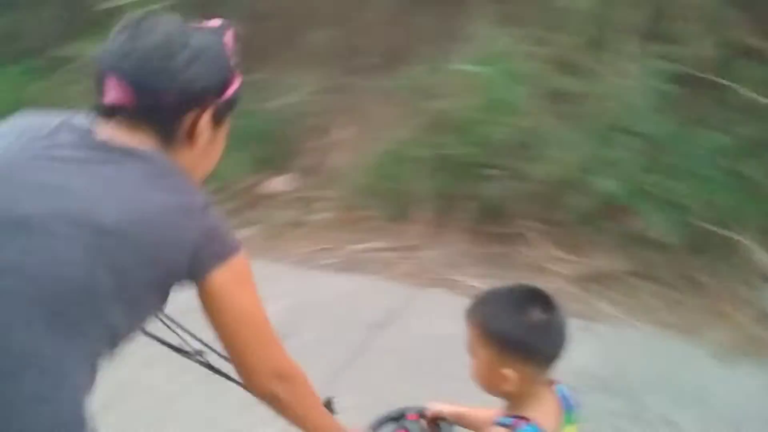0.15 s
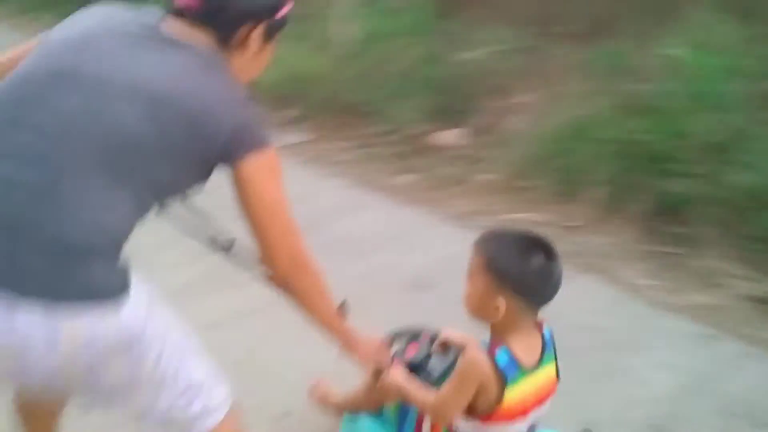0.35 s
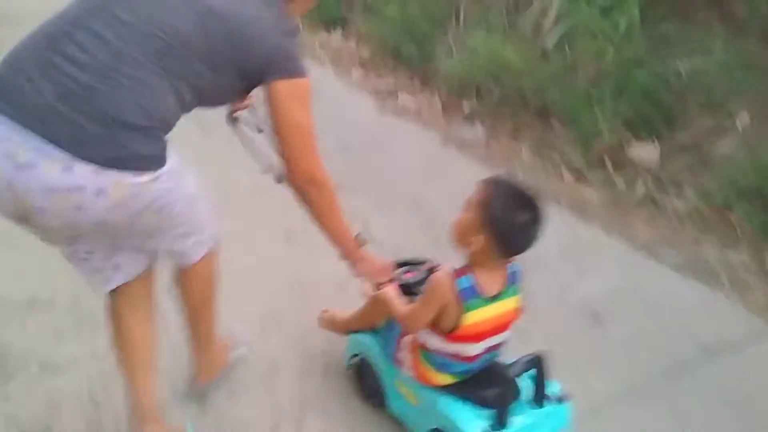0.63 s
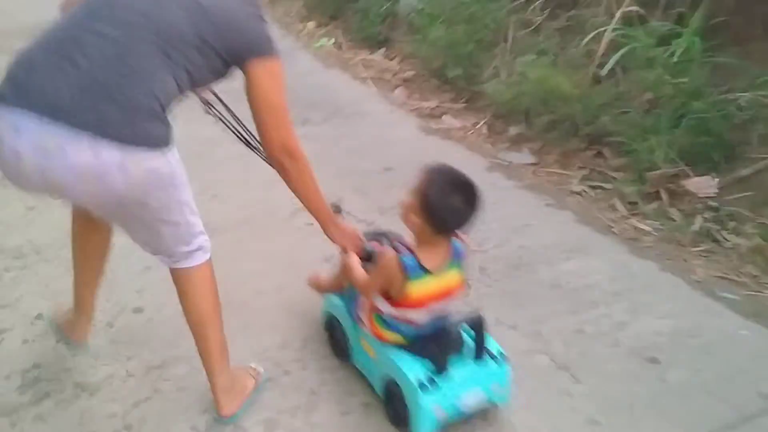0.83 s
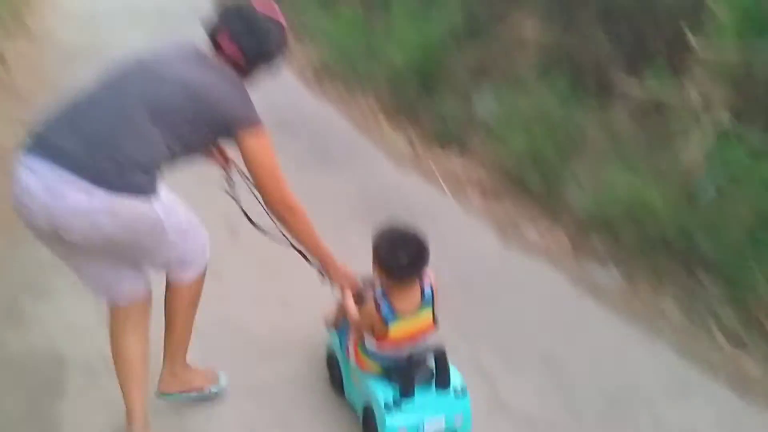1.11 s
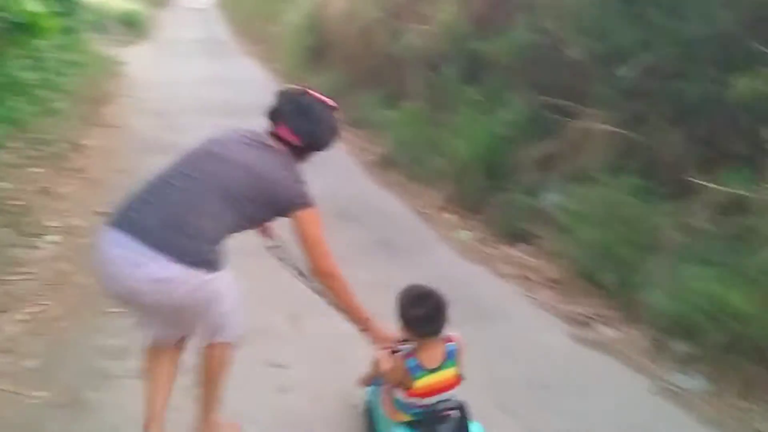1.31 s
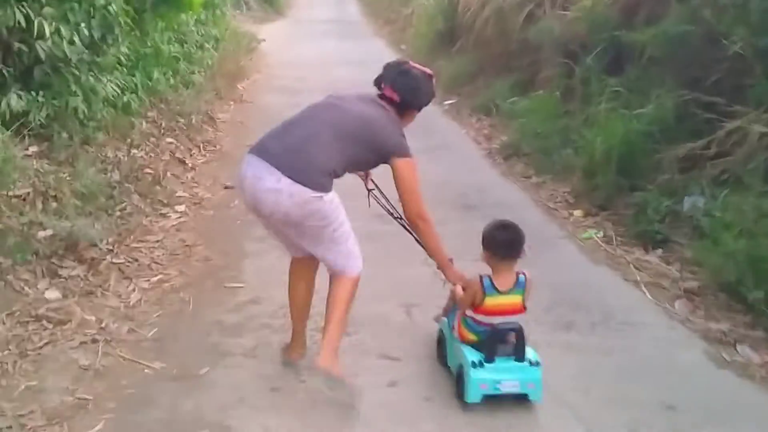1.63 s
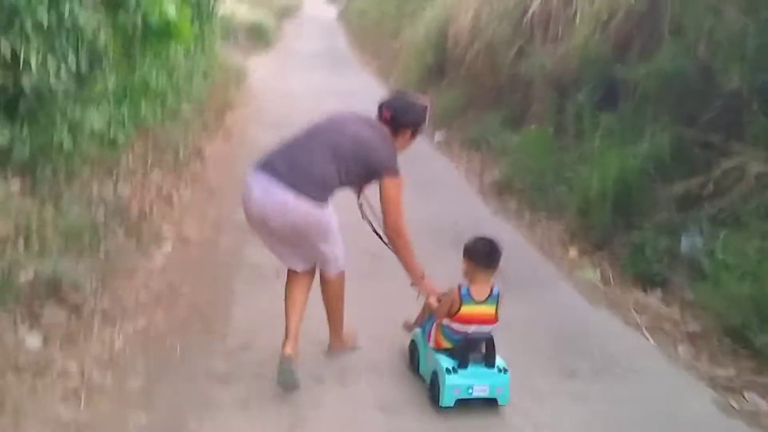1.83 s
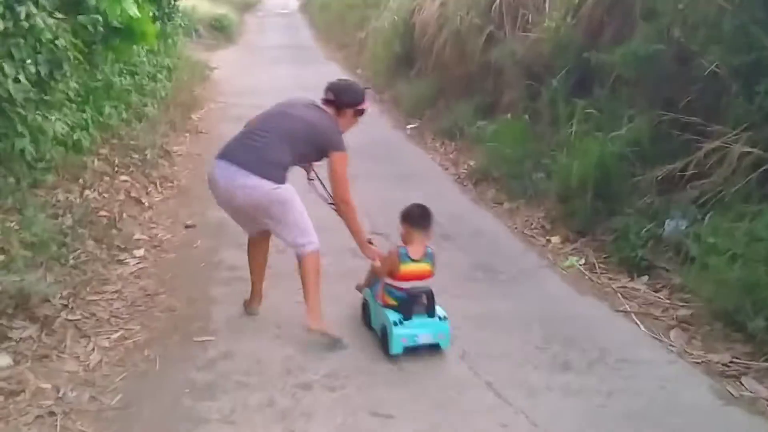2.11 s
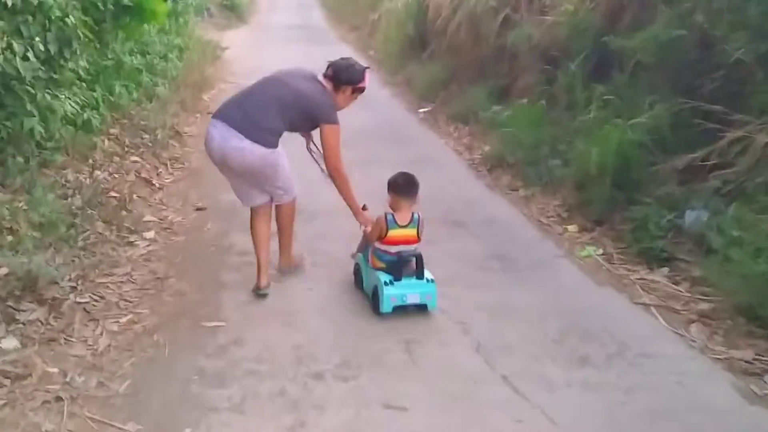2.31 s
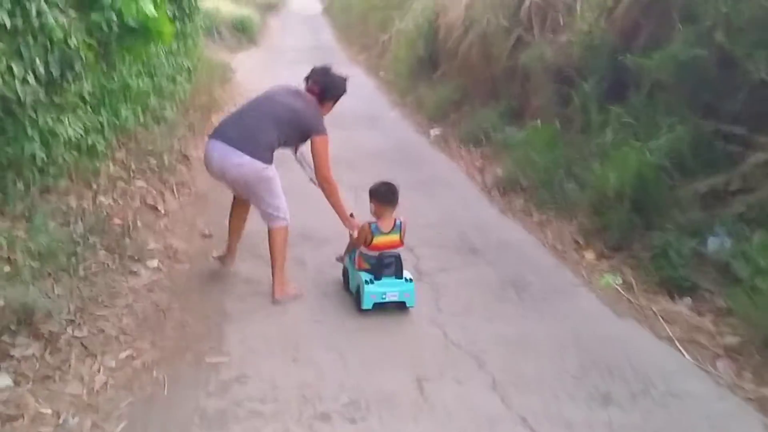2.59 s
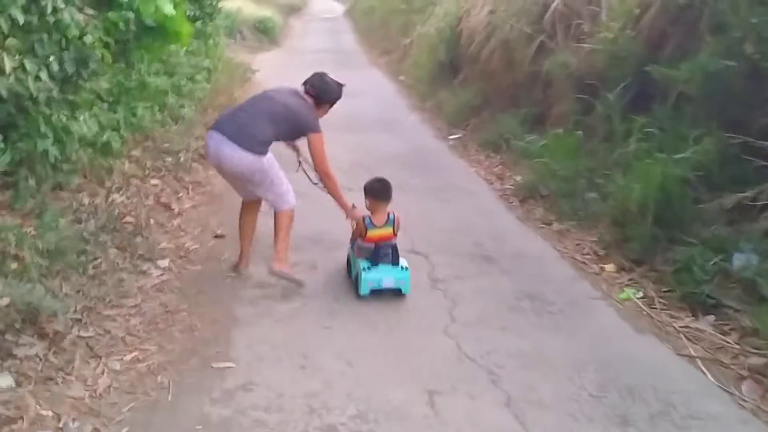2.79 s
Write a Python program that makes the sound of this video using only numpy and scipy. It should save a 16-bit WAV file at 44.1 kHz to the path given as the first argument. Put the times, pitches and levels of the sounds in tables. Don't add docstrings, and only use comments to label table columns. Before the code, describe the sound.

Hard plastic wheels of a hollow ride-on toy car rumble and rattle away over rough concrete

```python
import sys
import numpy as np
from scipy import signal
from scipy.io import wavfile
from scipy.ndimage import uniform_filter1d

SR = 44100
rng = np.random.default_rng(int(sys.argv[2]) if len(sys.argv) > 2 else 0)


def wrap_up_sound(samples):
    columns = np.atleast_2d(samples).T
    tamed = np.clip(columns, -1, 1)
    steps = np.round(tamed * 32767).astype(np.int16)
    wavfile.write(sys.argv[1], SR, steps)


def volts_from_decibels(level):
    exponent = np.asarray(level, float) / 20
    return 10 ** exponent


N = 130095

# time in seconds, level in dB.
ROLLING_LEVEL = [
    (0.0, -33.5),
    (0.57, -37.5),
    (0.91, -36),
    (1.16, -36.5),
    (1.42, -37),
    (1.91, -36.5),
    (2.0, -38.5),
    (2.24, -38),
    (2.95, -40),
]
# pitch in Hz, width in Hz, level in dB.
SHELL_RINGS = [(205, 32.4, 1), (240, 76, -2), (304.7, 33, -3.5), (362, 37, -6.5), (508.5, 77, -8),
               (690, 115, -4.5), (934, 120, -8), (1300, 56, -12.5), (1567, 250, -6), (2145, 190, -11.5),
               (3160, 200, -17), (3840, 670, -6), (4400, 560, -23.5), (5300, 750, -31)]
# pitch in Hz, level in dB per Hz.
TREAD_COLOUR = [(24, -75), (40, -38.5), (215, 2.5), (428, -22), (697, -14), (2630, -22.5), (3750, -21),
                (5840, -23.5), (7970, -53.5), (10400, -87), (17500, -120)]
# start in seconds, peak in dB, pitch in Hz, time to fall
# 60 dB in seconds.
BUMPS = [(0.024, -38, 232, 0.049), (0.087, -34, 207, 0.15), (0.147, -19.5, 240, 0.044),
         (0.281, -28, 332, 0.24), (0.402, -34, 193, 0.052), (0.474, -29.5, 178, 0.049),
         (0.52, -31, 203.5, 0.1), (0.742, -20.5, 224.7, 0.039), (0.809, -32, 205, 0.027),
         (0.882, -36, 220, 0.04), (0.933, -28.5, 226.8, 0.063), (1.042, -33.5, 256, 0.035),
         (1.11, -38, 217, 0.067), (1.15, -26.5, 204.3, 0.035), (1.189, -34.5, 205, 0.1),
         (1.287, -29, 213, 0.043), (1.348, -33, 205, 0.033), (1.569, -25.5, 199.5, 0.051),
         (1.894, -37.5, 206.5, 0.14), (1.982, -30.5, 212, 0.15), (2.031, -33.5, 176.5, 0.089),
         (2.089, -34, 216.6, 0.13), (2.212, -34, 244, 0.071), (2.253, -28.5, 223, 0.026),
         (2.299, -33, 261, 0.085), (2.422, -29, 227, 0.037), (2.598, -39, 211, 0.084),
         (2.896, -34, 202, 0.026),
         (0.039, -32.5, 244, 0.063), (0.13, -24.5, 293, 0.063), (0.164, -25.5, 225.5, 0.054),
               (0.185, -23, 233.5, 0.058), (0.224, -37, 225, 0.042), (0.3, -28.5, 310.6, 0.096),
               (0.319, -27.5, 319, 0.045), (0.339, -32.5, 337, 0.026), (0.542, -29, 232, 0.062),
               (0.597, -29.5, 361.5, 0.019), (1.11, -32, 224.7, 0.11), (1.235, -33.5, 247, 0.13),
               (1.313, -27, 240, 0.052), (1.699, -31, 234.3, 0.08), (0.014, -35.5, 304, 0.065),
               (0.284, -28, 184, 0.11), (0.325, -28, 393, 0.046), (0.688, -33.5, 335, 0.054),
               (1.942, -32.5, 233, 0.06), (2.129, -36, 215.5, 0.046), (2.362, -34.5, 257, 0.08),
               (2.47, -37.5, 193, 0.12), (2.644, -34.5, 216, 0.07), (2.86, -36, 224, 0.024)]
# start in seconds, peak in dB, pitch in Hz, length in
# seconds, shell share in dB.
RATTLES = [(0.055, -33.5, 774, 0.006, 5), (0.143, -21.5, 610, 0.014, 2.5),
           (0.162, -19.5, 1580, 0.0079, 15), (0.293, -25.5, 705, 0.0075, 0.5),
           (0.3316, -24.5, 5670, 0.0034, -5.5), (0.397, -32, 1480, 0.0067, 10),
           (0.42, -40.5, 740, 0.0051, 4), (0.5948, -30, 744, 0.0046, -1.5),
           (0.742, -23, 635, 0.014, 3), (0.7644, -26.5, 1300, 0.016, 2), (0.812, -28, 1890, 0.015, 9),
           (0.974, -31, 3900, 0.0071, 2), (1.0744, -27.5, 690, 0.0056, 5),
           (1.108, -28.5, 652, 0.011, 5), (1.149, -25.5, 565, 0.0058, -6.5),
           (1.263, -26, 930, 0.024, 3), (1.4277, -35, 730, 0.0053, -17),
           (1.444, -32.5, 700, 0.0079, -6.5), (1.503, -33, 1200, 0.0061, -3),
           (1.5628, -25, 1700, 0.003, 13), (1.6694, -28.5, 3880, 0.0057, 5.5),
           (1.77, -31, 618, 0.0062, 2.5), (1.793, -28.5, 646, 0.0051, -0.5),
           (1.826, -33, 3910, 0.0071, -4),
           (1.707, -27.5, 1760, 0.0037, -3), (1.713, -32.5, 5170, 0.027, 6),
                 (1.897, -32, 960, 0.0087, -3), (1.933, -29, 750, 0.0033, 5),
                 (1.9465, -29.5, 1610, 0.0076, -1), (2.001, -28, 5100, 0.0091, 6),
                 (2.02, -32.5, 710, 0.007, 0), (2.2054, -28.5, 3880, 0.0064, 2.5),
                 (2.253, -31.5, 990, 0.0045, 3), (2.417, -34, 670, 0.0084, 4),
                 (2.498, -40.5, 644, 0.0037, 2), (2.7793, -33, 600, 0.0099, 0.5),
                 (2.7945, -34.5, 674, 0.0051, 0), (2.857, -33.5, 728, 0.0045, -5),
                 (2.921, -35, 617, 0.0061, 0), (2.9424, -37, 600, 0.0055, 2)]
# start in seconds, peak in dB, pitch in Hz,
# time to fall 60 dB in seconds.
KNOCKS = [(0.1596, -23.5, 4030, 0.011), (0.297, -26, 3770, 0.013), (0.3325, -19.5, 5590, 0.017),
          (0.3348, -21, 5010, 0.026), (0.3356, -22, 4090, 0.027), (0.348, -29, 5500, .012),
          (0.4135, -28.5, 3570, 0.0099), (0.468, -34.5, 3750, .015), (0.5656, -36, 2680, .015),
          (0.5945, -36, 1500, 0.01), (0.646, -34, 1600, 0.024), (0.7415, -38, 3420, .012),
          (0.748, -45, 4060, 0.025), (0.7834, -20, 950, 0.021), (0.7924, -23, 2150, .02),
          (0.7969, -20.5, 1810, 0.019), (0.809, -40, 2150, .015), (0.8634, -36, 1860, .015),
          (0.912, -36, 3050, 0.014), (0.9737, -35.5, 3980, 0.022), (1.028, -36, 1750, .012),
          (1.3937, -34.5, 4000, 0.011), (1.428, -30.5, 1600, 0.02), (1.4496, -31.5, 3490, 0.017),
          (1.7088, -21.5, 4700, .015), (1.7097, -20, 3220, 0.025), (1.7125, -19.5, 3950, 0.041),
          (1.8287, -31.5, 4560, 0.017), (1.9342, -21.5, 1370, 0.0055), (1.946, -31, 1590, 0.017),
          (1.9485, -28.5, 3350, 0.027), (2.002, -24.5, 4490, 0.017), (2.022, -31, 4530, 0.017),
          (2.0252, -35, 910, 0.0098), (2.042, -32, 4400, .015), (2.1327, -37, 1630, 0.014),
          (2.2058, -28.5, 3724, 0.043), (2.236, -35.5, 3950, 0.045), (2.386, -37, 1600, 0.02),
          (2.451, -39.5, 1500, .015), (2.6334, -39, 3770, .02), (2.655, -36.5, 2000, 0.027),
          (0.2205, -25, 1856, 0.032), (0.782, -27.5, 3430, .012), (1.722, -28.5, 3880, 0.087)]
# start in seconds, peak in dB, top pitch in Hz, scuff level in dB, scuff length in seconds.
SANDAL_SLAPS = [
    (0.2087, -7.5, 4960, -18, 0.035),
    (0.78, -13.5, 2740, -16.5, 0.027),
]
# pitch in Hz, width in Hz, level in dB.
SOLE_RINGS = [(710, 320, -13.5), (1020, 170, -5), (1470, 240, -1), (2057, 170, 5.5), (2870, 350, -7),
              (3610, 200, -2.5), (5230, 1800, -6)]
# start in seconds, length in seconds, pitch in Hz, level in dB.
PLASTIC_SQUEAK = (.972, .046, 5800, -43)


def rms_one(x):
    return x / np.sqrt(np.mean(x ** 2) + 1e-20)


def drift(rate_hz):
    r = np.exp(-80 * np.pi * rate_hz / SR)
    slow = signal.lfilter([1], [1, -2 * r, r * r], rng.standard_normal(N // 40 + 2002))
    slow = slow[2000:]
    return np.interp(np.arange(N) / 40, np.arange(len(slow)), rms_one(slow - slow.mean()))


def resonate(x, hz, width_hz):
    r = np.exp(-np.pi * width_hz / SR)
    gain = (1 - r * r) / 2
    feedback = [1, -2 * r * np.cos(2 * np.pi * hz / SR), r * r]
    return signal.lfilter(np.array([1, 0, -1]) * gain, feedback, x + 1e-18)


def add(out, start_s, sound, peak_db):
    i = int(start_s * SR)
    sound = sound[:N - i]
    out[i:i + len(sound)] += volts_from_decibels(peak_db) * sound / np.abs(sound).max()


def grit(roughness):
    grains_per_s, size_spread_db, bass_fade_db_per_s = 1500, 2.5, 4
    sizes = volts_from_decibels(size_spread_db * np.minimum(rng.exponential(1, N), 4)) * rng.choice([-1, 1], N)
    clicks = sizes * (rng.random(N) < grains_per_s / SR) * volts_from_decibels(1.6 * roughness)
    from_middle_s = np.arange(N) / SR - 1.5
    out = np.zeros(N)
    for hz, width_hz, db in SHELL_RINGS:
        fade_db = bass_fade_db_per_s * (hz < 450) * from_middle_s
        ring = rms_one(resonate(clicks * rng.standard_normal(N), hz, width_hz))
        out += volts_from_decibels(db - fade_db) * ring
    return volts_from_decibels(-4.5) * rms_one(out)


def tread(roughness):
    edges = 40 * 2 ** np.arange(0, 7.8, 1 / 3)
    white = rng.standard_normal((2, N))
    hz, db = np.transpose(TREAD_COLOUR)
    out = np.zeros(N)
    for k, (low, high) in enumerate(zip(edges, edges[1:])):
        band = signal.sosfilt(signal.butter(2, [low, high], "band", fs=SR, output="sos"), white[k % 2])
        colour_db = np.interp(np.log(low * high) / 2, np.log(hz), db)
        flicker_db = 1.3 * (1.3 * roughness + drift(15))
        out += band * volts_from_decibels(colour_db + flicker_db)
    return volts_from_decibels(-6) * rms_one(out)


def bumps():
    push_s, upper_ratio, upper_db = 0.007, 1.7, -12.5
    out, t = np.zeros(N), np.arange(SR // 4) / SR
    for start_s, peak_db, hz, t60_s in BUMPS:
        shape = (1 - np.exp(-t / push_s)) * volts_from_decibels(-60 * t / max(t60_s, 0.02))
        low = np.sin(2 * np.pi * hz * t)
        upper = volts_from_decibels(upper_db) * np.sin(2 * np.pi * hz * upper_ratio * t)
        add(out, start_s, shape * (low + upper), peak_db)
    return out


def rattles():
    clicks_per_s, first_click, width_share = 3500, 2.9, 0.077
    tail_s, tail_db = 0.025, -13
    partner_ratio, partner_db = 0.783, -6.5
    out, t = np.zeros(N), np.arange(SR // 8) / SR
    for start_s, peak_db, hz, length_s, shell_db in RATTLES:
        chance, size = rng.random(len(t)), rng.standard_normal(len(t))
        clicks = size * (0.26 + 2 * (chance < clicks_per_s / SR))
        clicks[0] = first_click
        clicks *= np.exp(-(t / length_s) ** 1.35) + volts_from_decibels(tail_db) * np.exp(-t / tail_s)
        shell = np.zeros(len(t))
        for k, (ring_hz, width_hz, db) in enumerate(SHELL_RINGS[4:]):
            shell += (-1) ** k * volts_from_decibels(db) * rms_one(resonate(clicks, ring_hz, width_hz * 2.64))
        shell = rms_one(shell) + volts_from_decibels(-4) * rms_one(resonate(clicks, 3500, 2800))
        part = resonate(clicks, hz, hz * width_share)
        part -= volts_from_decibels(partner_db) * resonate(clicks, hz * partner_ratio, hz * width_share)
        add(out, start_s, rms_one(part) + volts_from_decibels(shell_db) * shell, peak_db)
    return out


def knocks():
    rise_s, overtone_ratio, overtone_db, snap_db = 0.00039, 1.4, -14, -6.5
    crunch_db, crunch_lasts, crunch_width = -6.5, 2.86, 0.54
    out, t = np.zeros(N), np.arange(SR // 10) / SR
    for start_s, peak_db, hz, t60_s in KNOCKS:
        fall = volts_from_decibels(-60 * t / min(t60_s, 0.08))
        overtone = volts_from_decibels(overtone_db) * fall * np.sin(2 * np.pi * hz * overtone_ratio * t)
        ring = np.sin(2 * np.pi * hz * t) + overtone
        crunch = rms_one(resonate(rng.standard_normal(len(t)), hz, hz * crunch_width))
        crunch *= fall ** (1 / crunch_lasts) * volts_from_decibels(crunch_db) / 2
        snap = resonate(1.0 * (t == 0), hz, hz)
        snap *= volts_from_decibels(snap_db) / snap.max()
        add(out, start_s, (1 - np.exp(-t / rise_s)) * (fall * ring + crunch) - snap, peak_db - 2)
    return out


def slaps():
    slap_s, echo_s, echo_size = 0.001, 0.001725, 0.49
    scuff_delay_s, scuff_hz, scuff_width_hz = 0.008, 1900, 800
    out, t = np.zeros(N), np.arange(SR // 8) / SR
    for start_s, peak_db, top_hz, scuff_db, scuff_s in SANDAL_SLAPS:
        push = -np.exp(-((t - slap_s) * SR / 3) ** 2)
        push -= echo_size * np.exp(-((t - slap_s - echo_s) * SR / 3) ** 2)
        push += 0.3 * rng.standard_normal(len(t)) * np.exp(-t / slap_s / 2)
        crack = sum(volts_from_decibels(db) * rms_one(resonate(push, hz, width_hz)) for hz, width_hz, db in SOLE_RINGS)
        dull = signal.butter(2, top_hz, fs=SR, output="sos")
        add(out, start_s, signal.sosfilt(dull, -crack), peak_db)
        scuff = resonate(rng.standard_normal(len(t)), scuff_hz, scuff_width_hz)
        scuff *= np.minimum(t / 0.0017, 1) * np.exp(-(t / scuff_s) ** 2)
        add(out, start_s + scuff_delay_s, scuff, peak_db + scuff_db)
    return out


def squeak():
    start_s, length_s, hz, db = PLASTIC_SQUEAK
    t = np.arange(N) / SR - start_s
    tone = rms_one(resonate(resonate(rng.standard_normal(N), hz, 350), hz, 350))
    return volts_from_decibels(db) * tone * np.clip(np.minimum(t / 0.0024, (length_s - t) / 0.031), 0, 1)


def hum():
    return volts_from_decibels(-81 + 3 * drift(5)) * np.sin(2 * np.pi * 60 * np.arange(N) / SR)


def road_roughness(thumps, near_db):
    shaken = uniform_filter1d(thumps ** 2, size=int(0.023 * SR)) / volts_from_decibels(near_db) ** 2
    patches = 1.3 * np.tanh(0.5 * drift(16) + 0.7 * drift(45))
    return patches + 0.14 * (10 * np.log10(np.clip(shaken, 0.05, 2.5)) + 5)


def scene():
    near_db = np.interp(np.arange(N) / SR, *np.transpose(ROLLING_LEVEL))
    thumps = bumps()
    roughness = road_roughness(thumps, near_db)
    rolling = volts_from_decibels(near_db) * (grit(roughness) + tread(roughness))
    sources = rolling + thumps + rattles() + knocks() + slaps() + squeak()
    low_cut = signal.butter(4, 131.6, "high", fs=SR, output="sos")
    return (signal.sosfilt(low_cut, sources) + hum())[None]


def top_cut(x):
    return signal.sosfilt(signal.butter(12, 8120, fs=SR, output="sos"), x)


def record(dry):
    x = signal.sosfilt(signal.butter(8, 5997, fs=SR, output="sos"), dry)
    x = signal.sosfilt(signal.cheby2(12, 45, 8250, fs=SR, output="sos"), x)
    hiss_top = signal.butter(8, 15500, fs=SR, output="sos")
    hiss = volts_from_decibels(-92.5) * signal.sosfilt(hiss_top, rng.standard_normal(dry.shape))
    return top_cut(x + hiss)


dry = scene()
out = record(dry)
wrap_up_sound(out)
```